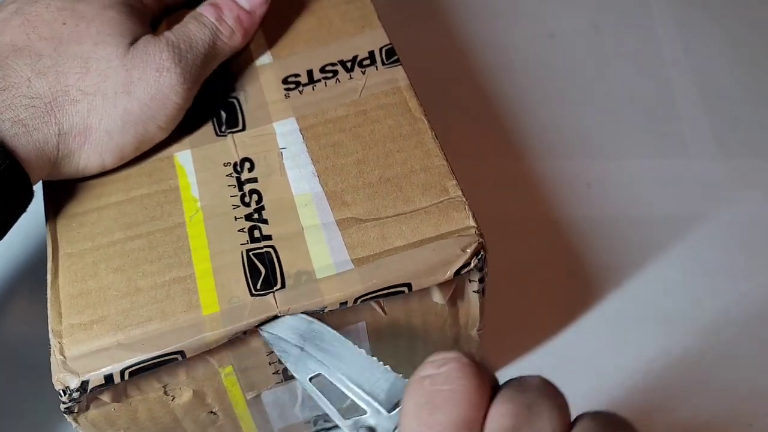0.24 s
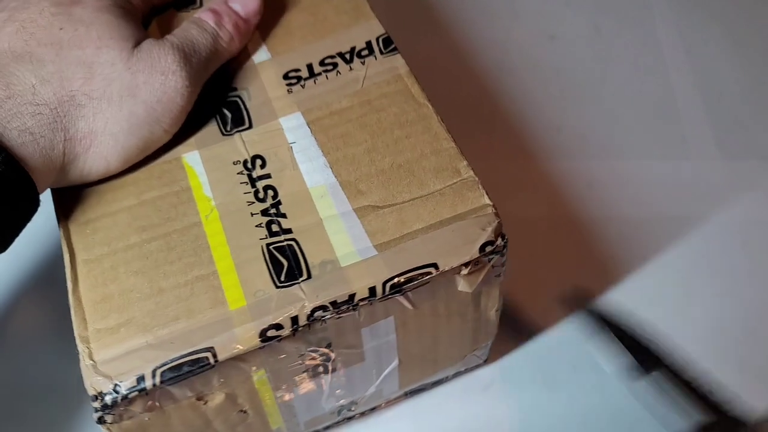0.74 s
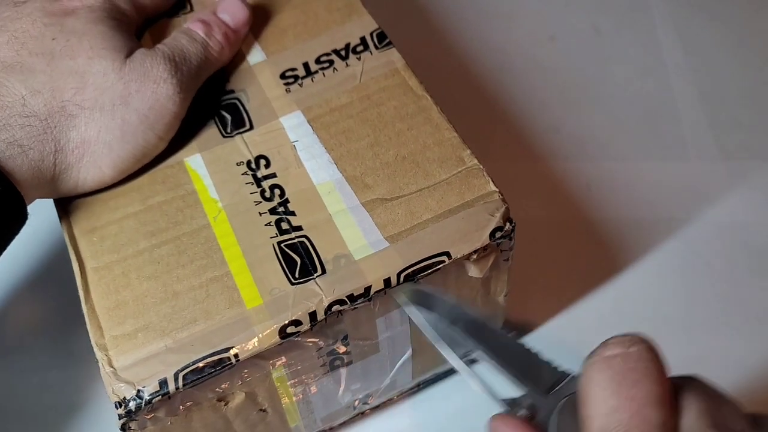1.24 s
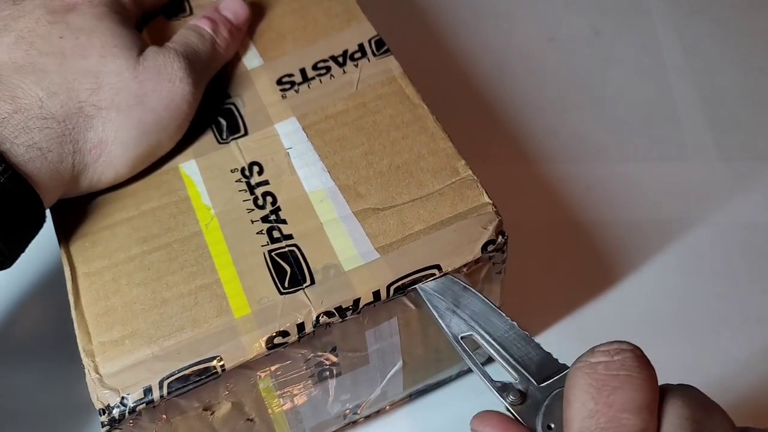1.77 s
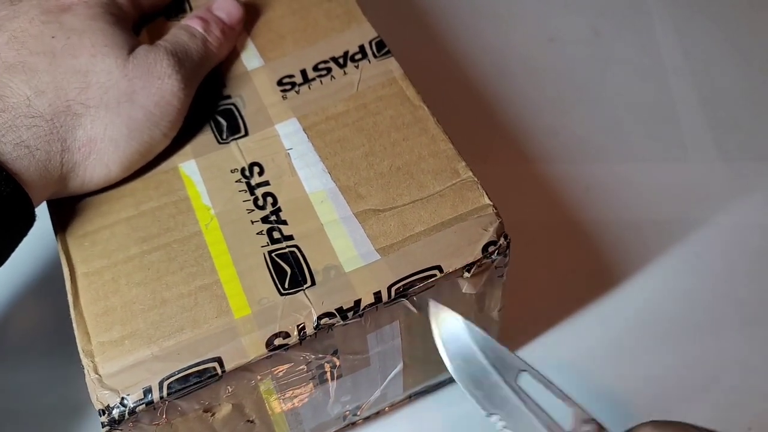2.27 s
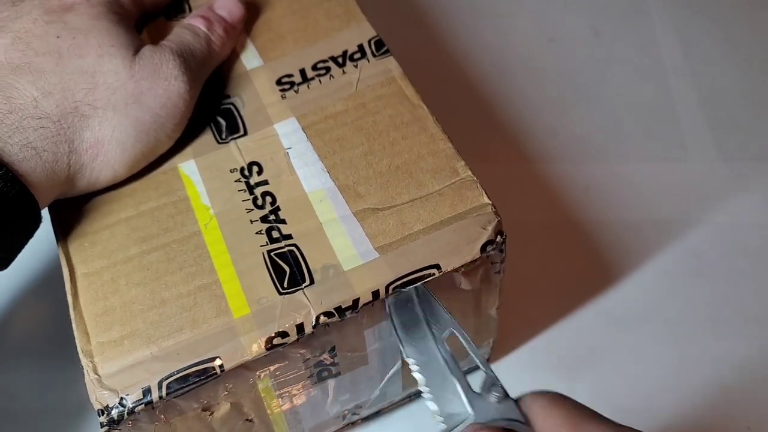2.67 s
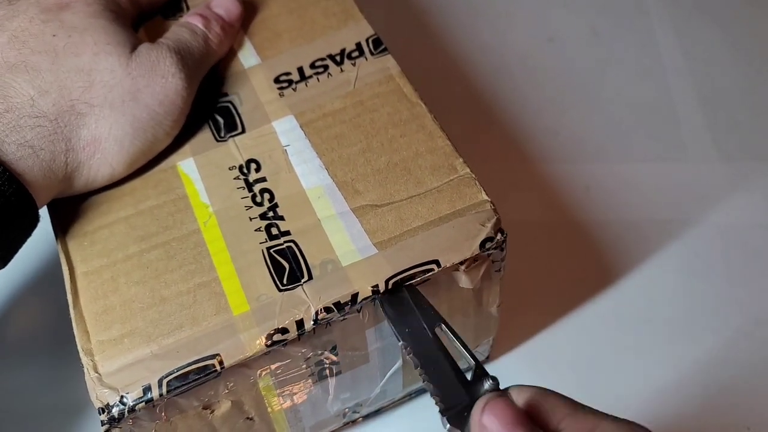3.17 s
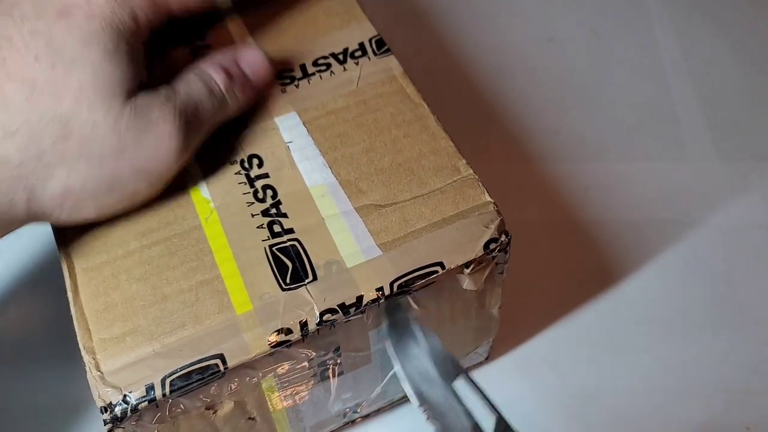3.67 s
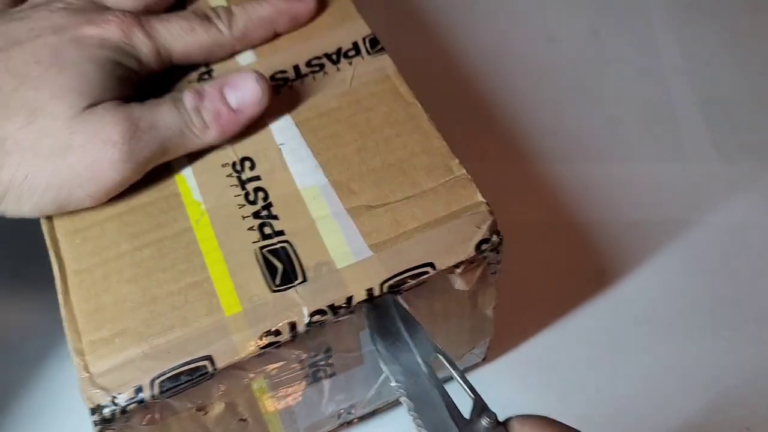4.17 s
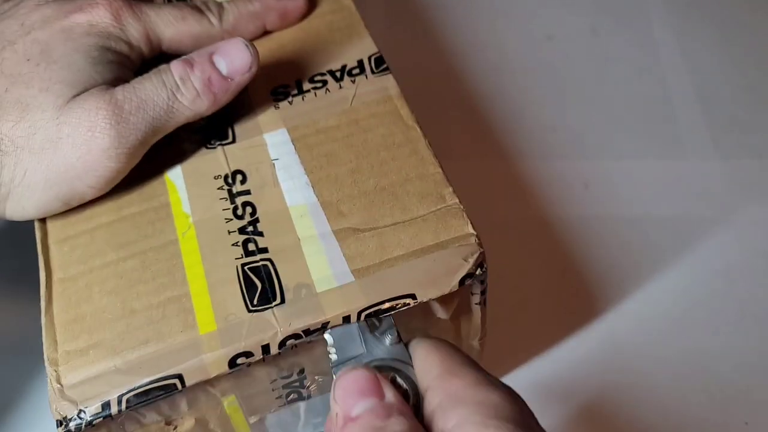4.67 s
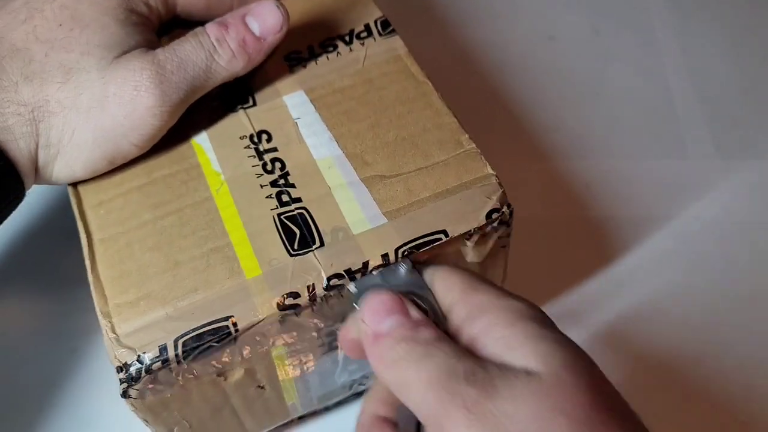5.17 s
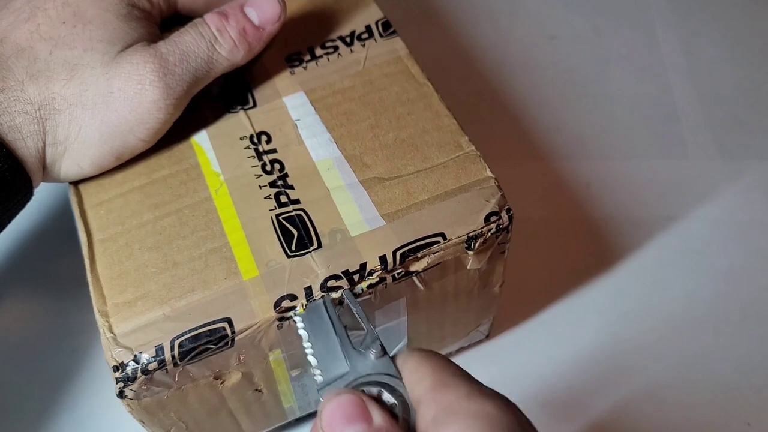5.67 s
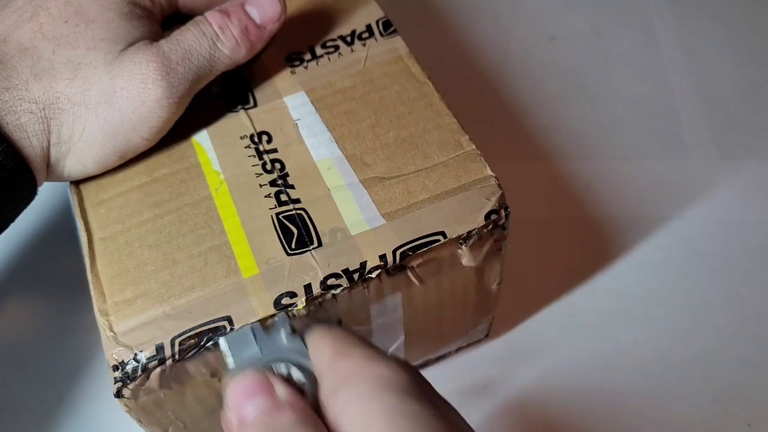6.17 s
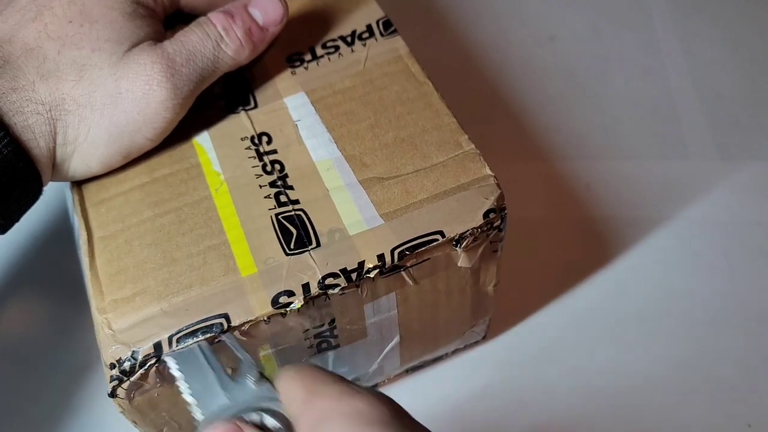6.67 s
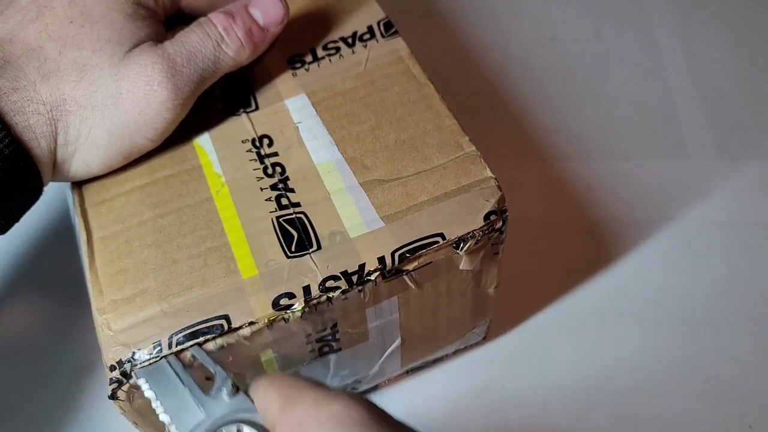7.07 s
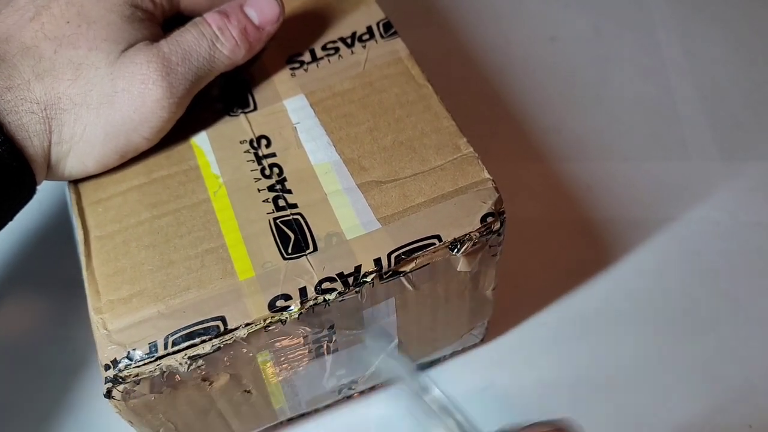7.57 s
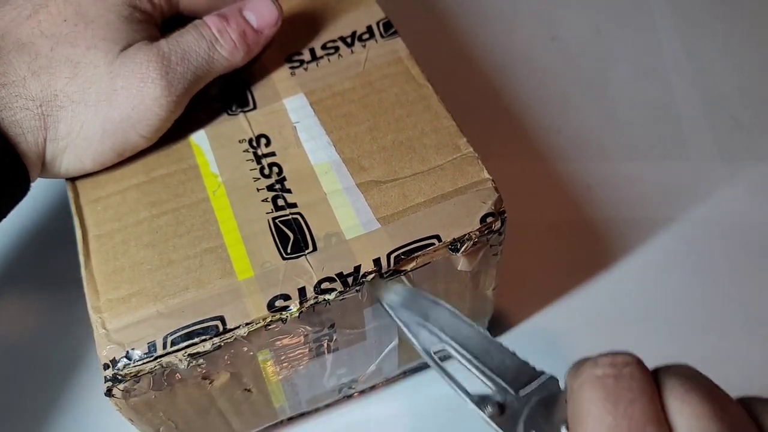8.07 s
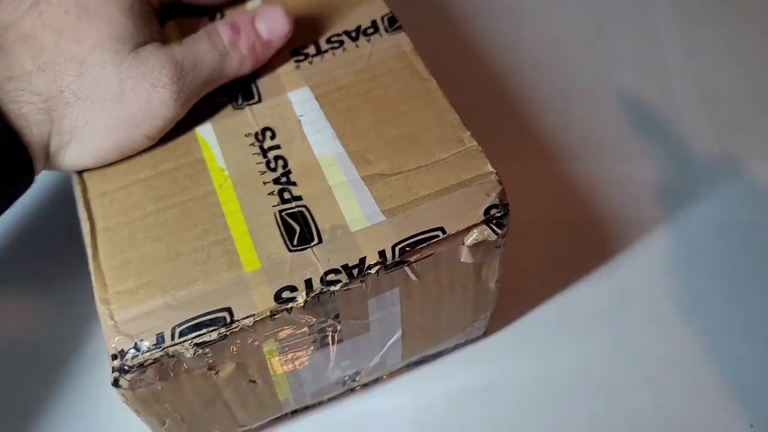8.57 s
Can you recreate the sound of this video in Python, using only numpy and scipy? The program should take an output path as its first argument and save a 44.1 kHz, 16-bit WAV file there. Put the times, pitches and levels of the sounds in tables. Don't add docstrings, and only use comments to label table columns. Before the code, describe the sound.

Indoors and very close, a serrated knife cuts a taped cardboard box, with a faint house hum beneath and a short bare-room echo. From 0 to 0.5 s there is light scratching and tiny ticks; at about 0.52 s a sharp, loud crack with a hollow knock, by far the loudest event. It falls almost silent until short crunchy scrapes at 1.35 and 1.6 s, and a soft drag near 2.2. Bites and pops come around 2.5 to 3.3 s, a bright tape snap at 3.3, then a lull. From 4.2 to 6.9 s irregular gritty sawing strokes crowd together, dry and raspy, with fibre snaps, a strong one at 5.05, and dull box thumps. Strokes weaken through 7.7 s, nearly stop, then a brief cluster of tearing and thuds at 8.4 to 8.7 fades into a faint scrape.

```python
import sys
import numpy as np
from scipy import signal
from scipy.fft import rfft, irfft, next_fast_len
from scipy.io import wavfile
from scipy.ndimage import uniform_filter1d, map_coordinates

SR = 44100
rng = np.random.default_rng(int(sys.argv[2]) if len(sys.argv) > 2 else 0)


def to_wav(sig):
    pcm = np.clip(np.atleast_2d(sig), -1, 1) * 32767
    pcm = np.round(pcm).astype(np.int16)
    wavfile.write(sys.argv[1], SR, pcm.T)


def boost_factor(decibels):
    exponent = np.asarray(decibels, float) / 20
    return 10 ** exponent


N = 389841

# f/Hz, width/Hz, level/dB
BOARD_MODES = [(608, 990, -13.5), (880, 87, -26), (1150, 590, 3), (1610, 820, 3.5), (2077, 150, 4.5),
               (3380, 510, 2), (3700, 390, -8.5), (5170, 770, -20)]
# f/Hz, width/Hz, level/dB
BOX_MODES = [(90.33, 23, 2.5), (150, 38, 3), (229.7, 21, 0.5), (301.4, 170, -3.5), (353, 50, -5),
             (387, 33, 8.5)]


def unit(x):
    return x / np.sqrt(np.mean(x ** 2))


def ring(x, hz, width_hz):
    return signal.lfilter(*signal.iirpeak(hz, hz / width_hz, SR), x)


def body(x, modes):
    return sum((-1) ** k * boost_factor(db) * ring(x, hz, width) for k, (hz, width, db) in enumerate(modes))


def cut(x, hz, kind, order=2):
    return signal.sosfilt(signal.butter(order, hz, kind, fs=SR, output="sos"), x)


def band_edge(x):
    return signal.sosfilt(signal.ellip(8, .3, 40, 14600, fs=SR, output="sos"), x)


def colour(x, points):
    hz, db = np.transpose(points)
    size = next_fast_len(N)
    f = np.maximum(np.arange(size // 2 + 1) * SR / size, 1)
    gain = boost_factor(np.interp(np.log(f), np.log(hz), db))
    return irfft(rfft(x, size) * gain, size)[..., :N]


def walk(rate):
    hold = int(SR / rate)
    levels = rng.standard_normal(N)[:N // hold + 1]
    return uniform_filter1d(np.repeat(levels, hold), hold)[:N]


def grains(rate, spread_db, smooth):
    chance, size = rng.random(N), rng.exponential(size=N)
    sign = np.sign(rng.standard_normal(N))
    slips = (chance < rate / SR) * sign * boost_factor(spread_db * np.minimum(size, 3.5))
    return unit(slips) + smooth * rng.standard_normal(N)


def likeness(mid, side, hz, split_hz):
    share = min(hz / split_hz, 1) ** 2
    return mid * np.sqrt(1 - share / 2) + np.sqrt(share / 2) * side * np.array([[1], [-1]])


def house():
    # f/Hz, level/dB (per Hz)
    hum_spectrum = [(15, -29), (25, 2.5), (69, 7.5), (264, -8), (363, -5), (673, -23), (1090, -19),
                    (1580, -14.5), (2370, -35.5), (6900, -32.5), (9770, -50), (12400, -48), (15000, -43)]
    mid, left, right = colour(rng.standard_normal((3, N)), hum_spectrum) * boost_factor(0.5 * walk(9))
    bass = cut(mid, 720, "lowpass")
    apart = np.array([left, right])
    return boost_factor(-63.5) * unit(bass + cut(apart, 600, "highpass") + .35 * apart)


def room(x):
    # f/Hz, t60/s, level/dB
    decay_bands = [(91.1, 0.45, -27), (180, .45, -24.5), (335, 0.2, -24), (780, 0.38, -21),
                   (1440, .5, -18.5), (2820, 0.74, -20.5), (5570, 0.3, -12.5), (11000, 0.36, -18.5)]
    t, tail = np.arange(SR) / SR, 0
    for hz, t60, db in decay_bands:
        octave = (hz / np.sqrt(2), hz * np.sqrt(2))
        mid, side = cut(rng.standard_normal((2, SR)), octave, "bandpass", order=1)
        fade = np.exp(-np.log(1000) * t / t60) * (1 - np.exp(-t / 0.0066))
        echoes = likeness(mid, side, hz, split_hz=900.) * fade
        tail = tail + boost_factor(db) * echoes / np.sqrt(SR * t60 / 14) * np.sqrt(SR / hz)
    return signal.fftconvolve(x[None], tail, axes=1)[:, :N]


def thumps():
    # t/s, peak level/dB, wall note f/Hz
    blows = [(0.497, -27, 443), (0.518, -12.5, 415), (0.542, -26, 416), (1.347, -27.5, 338),
             (1.406, -27.5, 145), (1.588, -33, 288), (1.618, -27, 362), (2.48, -45.5, 208),
             (2.712, -34, 177), (2.858, -34, 336), (3.303, -39.5, 68), (4.252, -38, 93), (4.414, -39, 333),
             (4.585, -27, 107), (4.688, -30, 335), (4.802, -31.5, 350), (5.038, -41, 390),
             (5.481, -21, 125), (5.656, -26, 175), (5.833, -26, 265), (5.988, -27, 152),
             (6.139, -27.5, 252), (6.274, -21, 168), (6.612, -31.5, 162), (6.911, -33.5, 400),
             (7.588, -37, 229), (7.873, -43, 143), (8.442, -21.5, 175), (8.505, -28, 150),
             (8.663, -35.5, 356)]
    # t/s, peak level/dB, wall note f/Hz
    further_blows = [(2.497, -41.5, 231), (3.062, -40, 402), (3.551, -41, 306), (4.33, -36.5, 310),
                     (4.361, -40.5, 330), (5.334, -34, 313.6), (5.698, -28, 156), (6.024, -27, 148),
                     (6.038, -35, 180), (6.292, -30, 141), (6.646, -29.5, 176), (6.817, -34.5, 383),
                     (6.939, -34, 390), (7.209, -49, 374), (8.281, -42.5, 127)]
    size = 8192
    out, t = np.zeros(N + size), np.arange(size) / SR
    for s, db, hz in blows + further_blows:
        push = np.sin(2 * np.pi * hz * t) * (t < .5 / hz)
        thump = ring(push, hz, .45 * hz) + .25 * body(push, BOX_MODES)
        i = int(s * SR)
        out[i:i + size] += boost_factor(db) * thump / np.abs(thump).max()
    return cut(out[:N], 55, "highpass")


def snaps():
    # t/s, body peak level/dB, body f/Hz, edge peak level/dB
    tape_snaps = [(.1771, -47, 1700, -43), (.3863, -49, 1640, -36), (.5491, -14, 1560, -39),
                  (1.9501, -74, 600, -54), (7.7185, -71, 650, -72), (8.05, -70, 1500, -66),
                  (3.3083, -25, 1120, -16), (3.5535, -39, 1650, -52), (3.7848, -59, 1150, -64),
                  (4.6862, -30, 1610, -46), (6.0844, -45, 1610, -41), (6.5553, -47, 1180, -30),
                  (6.7297, -48, 1250, -43), (8.3977, -38, 600, -44)]
    seam_snaps = [(.2725, -38, 1440, -57), (.4658, -39, 1130, -35), (.488, -38, 600, -40),
                  (.5134, -19, 850, -46), (4.196, -50, 900, -58), (1.6207, -33, 1780, -43),
                  (2.7093, -34, 940, -34), (2.8689, -14, 1050, -20), (3.2047, -40, 940, -58),
                  (3.2394, -39, 900, -46), (3.5856, -33, 800, -50), (4.2414, -34, 1730, -46),
                  (4.4986, -40, 980, -40), (4.5252, -29, 830, -37), (4.9514, -35, 1220, -26),
                  (5.0943, -31, 640, -25), (5.2483, -36, 1660, -37), (5.4372, -31, 2130, -26),
                  (5.4845, -21, 880, -38), (6.143, -26, 1750, -31), (6.1572, -20, 2010, -25),
                  (6.1706, -30, 2070, -26), (6.2746, -33, 600, -33), (6.9083, -32, 600, -37),
                  (7.2032, -40, 1280, -43), (7.9651, -60, 1700, -50), (8.4157, -28, 600, -35),
                  (8.4427, -27, 600, -32), (8.453, -29, 1100, -31), (8.5095, -17, 1550, -36)]
    fibre_snaps = [(.096, -40, 1320, -41), (.2529, -37, 1380, -43), (.4104, -43, 1710, -35),
                   (.4961, -34, 600, -29), (.5181, -5, 980, -10), (.5577, -11, 2130, -23),
                   (1.0915, -58, 1500, -66), (1.3501, -21, 800, -13), (1.5662, -31, 2130, -39),
                   (1.5957, -35, 1020, -38), (2.4728, -44, 720, -55), (3.0765, -35, 600, -36),
                   (3.6829, -42, 730, -56), (4.4293, -28, 790, -34), (4.4337, -28, 1290, -31),
                   (4.695, -16, 600, -13), (4.7303, -17, 950, -20), (5.051, -7, 780, -7),
                   (5.081, -22, 820, -18), (5.3335, -35, 600, -40), (5.4727, -22, 740, -25),
                   (5.498, -16, 860, -24), (5.612, -33, 2120, -33), (5.6427, -30, 600, -30),
                   (5.7901, -40, 1640, -25), (5.8428, -14, 1170, -11), (5.8706, -18, 1800, -14),
                   (7.5903, -41, 800, -47), (7.8784, -53, 600, -54), (8.6742, -30, 800, -40)]
    # air over edge level/dB, rustle over edge level/dB, left minus right level/dB
    tape_kind = (11, -12.5, 1.7)
    seam_kind = (-3.4, -29, -.6)
    fibre_kind = (-12, -37.5, -.4)
    kinds = ((tape_snaps, tape_kind), (seam_snaps, seam_kind), (fibre_snaps, fibre_kind))
    rows = [(*row, *kind) for table, kind in kinds for row in table]

    size = 8192
    out, t = np.zeros((2, N + size)), np.arange(size) / SR
    for s, body_db, hz, edge_db, air_db, rustle_db, pan_db in rows:
        noise = rng.standard_normal(size)
        burst = .15 * noise * np.exp(-t / .0016) * (1 - np.exp(-t / .001))
        burst[30] += 1
        burst[75 + int(12 * noise[0])] -= .3
        spot = cut(ring(burst, hz, .7 * hz) + .15 * body(burst, BOARD_MODES), 2800, "lowpass")
        edge = cut(burst, (2500, 6500), "bandpass", order=3)
        air = cut(burst, (6500, 15000), "bandpass", order=3)
        skin = ring(noise * np.exp(-t / 0.05) * (t > .001), 6500, 570)
        skin_db = edge_db + rustle_db + .7 * (edge_db + 16)
        parts = ((body_db, spot), (edge_db, edge), (edge_db + air_db, air), (skin_db, skin))
        snap = sum(boost_factor(db) * x / np.abs(x).max() for db, x in parts)
        i = int(s * SR) - 44
        out[:, i:i + size] += boost_factor(2.5 + np.array([[pan_db], [-pan_db]]) / 2) * snap
    return out[:, :N]


def pressure():
    # t/s, length/s, force level/dB, tape against board level/dB, weight on the box level/dB
    bites = [(0, 0.51, -56, -6.5, -6.5), (.387, 0.061, -67.5, 19.5, -2), (.521, 0.073, -23, -10, 5),
             (.62, 0.45, -63.5, -28, 11.5), (1.354, 0.091, -45.5, -7, 12.5), (1.567, 0.11, -48, -6, 5),
             (2.48, 0.19, -65, -24, 6.5), (2.715, 0.077, -40.5, -8, 8.5), (2.868, 0.035, -34, -1.5, -0.5),
             (2.89, 0.44, -63.5, 4.5, 12.5), (3.308, 0.02, -47, 19, -1.5), (3.33, 0.16, -83, 14, 6),
             (4.24, 0.14, -54.5, -1, 7), (5.024, 0.17, -52, -4.5, 15.5), (4.695, 0.032, -33.5, -22, 8.5),
             (4.952, .09, -48.5, 3, -2), (5.048, 0.045, -40.5, -15.5, 16), (5.438, 0.048, -44.5, 0.5, -6),
             (6.912, 0.17, -47, -0.5, 8.5), (7.209, 0.069, -54.5, 1.5, 12), (8.287, 0.042, -62, -26.5, 17),
             (8.447, 0.047, -35, -4, 12), (8.511, 0.069, -45, -1.5, 9.5)]
    drags = [(.511, 0.14, -49.5, 1.5, 9), (1.15, 0.1, -72.5, -12, 11.5), (1.659, 0.11, -47.5, -2, 11),
             (2.034, 0.21, -56, -22, 5), (2.7, 0.12, -61, -5, 1), (4.43, 0.34, -49.5, -6.5, 3.5),
             (4.68, 0.2, -50.5, -1, 4.5), (3.3, 0.049, -60, 8.5, -5.5), (5.357, 0.34, -57, 3.5, 13.5),
             (6.03, 0.24, -58.5, 6.5, 17), (7.125, 0.29, -58, -1.5, 7.5), (7.587, 0.22, -59.5, -1, 1.5),
             (8.416, .14, -46, -3.5, 5), (8.84, 0.57, -65.5, -2.5, 6)]
    strokes = [(.271, 0.17, -53, -4, -8.5), (3.087, 0.083, -48.5, -3, 4), (3.219, 0.089, -54, -4, 3.5),
               (3.56, 0.57, -67, 3.5, 9.5), (3.89, 0.29, -83, -12, 18), (4.1, .15, -71, -2.5, 1),
               (4.512, 0.14, -52.5, 2.5, 11.5), (4.805, 0.21, -47.5, -1.5, 11), (5.098, 0.17, -57, 8, 17),
               (5.238, 0.22, -54, -0.5, -13), (5.488, 0.15, -41.5, -2, 11.5), (5.626, 0.23, -46, -2, 4),
               (5.697, 0.12, -52, 2.5, 19), (5.85, 0.17, -41.5, -4.5, 5), (5.921, 0.52, -50, -2.5, -16),
               (6.16, .16, -39.5, -5, 2), (6.298, 0.26, -49, 3, 12), (6.461, 0.18, -48.5, -1.5, 6),
               (6.607, 0.21, -48, 1, 5), (6.812, 0.31, -54.5, -1.5, 10.5), (7.337, 0.15, -74, -0.5, 19.5),
               (7.486, 0.14, -59, -3, 7), (7.95, 0.91, -82, 5, 10), (8.67, 0.14, -58, -8.5, 13.5)]
    rest_levels = [-91.5, -101, -80]
    swing_db = 30
    edge = 1.465
    t, power = np.arange(N) / SR, boost_factor(rest_levels)[:, None] ** 2
    for moves, rise, hold in ((bites, 0.19, 0), (drags, 0.85, 0), (strokes, 0.51, 0.091)):
        for s, length, db, tape_db, box_db in moves:
            away = np.maximum((s - t) / rise, (t - s) / (1 - rise)) / length
            away = np.maximum(away - hold, 0) / (1 - hold)
            peak = boost_factor([[db], [db + tape_db], [db + box_db]]) ** 2
            power = power + peak * np.exp(-np.log(10) / 10 * swing_db * away ** edge)
    return 10 * np.log10(power)


def saw():
    # f/Hz, level/dB (per Hz)
    tape_spectrum = [(1470, -16), (2500, -9), (3890, -4.5), (4550, -2), (7080, -3), (9960, -9), (13000, -1),
                     (14700, -10.5), (16000, -39)]
    board_db, tape_db, box_db = pressure()
    catch = boost_factor(3.0 * walk(60) + 3.0 * walk(180))
    slips = grains(1000., spread_db=4.0, smooth=.5) * catch

    flute_db = 4.2
    board = 0.05 * cut(slips, (500, 3000), "bandpass", order=1)
    for hz, width, db in BOARD_MODES:
        drive = .5 * slips + catch * grains(350., spread_db=4.5, smooth=0.19)
        board = board + boost_factor(db + flute_db * walk(50)) * ring(drive, hz, width)

    sizzle = np.array([grains(4000., spread_db=9.0, smooth=0.93) for _ in range(2)])
    strip = colour(slips + 6.9 * catch * sizzle, tape_spectrum)
    tape = .35 * strip
    for hz in (2600, 3900, 5900, 8800, 12500):
        tape = tape + boost_factor(4.0 * walk(25)) * ring(strip, hz, hz / 2)
    tape = tape / np.std(cut(tape, 4500, "highpass", order=4))

    shoves = grains(150., spread_db=2.5, smooth=.4) * boost_factor(2.5 * walk(30))
    box = 0.31 * cut(shoves, (100, 900), "bandpass", order=1)
    for hz, width, db in BOX_MODES:
        box = box + boost_factor(db + flute_db * walk(7.5)) * ring(shoves, hz, width)

    return boost_factor(board_db + 4.5) * unit(board) + boost_factor(tape_db + 3.5) * tape + boost_factor(box_db - 1.5) * unit(box)


def scene():
    # t/s, lag/samples
    left_lag = [(0, 3.5), (.45, 3), (3.299, 4.5), (3.602, -3.5), (4.098, 5), (5.398, 2), (5.801, 1.5),
                (6.298, 0.5), (7.803, -3), (8.1, 5.5), (8.84, 5)]
    # t/ms, level/dB
    table_echo = [
        (.45, -18.5),
        (.8, -8),
    ]
    blows = thumps()
    rasp, breaks = saw() + blows, snaps()
    knife = band_edge(rasp) + breaks

    n = np.arange(N)
    half_lag = np.interp(n / SR, *np.transpose(left_lag)) / 2
    near = np.array([map_coordinates(knife[0], [n - half_lag], order=3),
                     map_coordinates(knife[1], [n + half_lag], order=3)])
    table = np.array([boost_factor(db) * np.roll(cut(x, 2800, "highpass"), int(ms * SR / 1000))
                      for x, (ms, db) in zip(near, table_echo)])
    shake = cut(blows, (35, 90), "bandpass") * np.array([[-.3], [.6]])
    far = room((rasp + boost_factor(-3.5) * breaks).mean(axis=0)) + house()
    return near + table + shake + band_edge(far)


def low_pass(x):
    return signal.sosfilt(signal.butter(12, 16510, fs=SR, output="sos"), x)


def record(dry):
    left = cut(dry[0], 54, "highpass", order=1)
    right = cut(dry[1], 12, "highpass", order=1)
    rounded = np.tanh(.8 * np.array([left, right])) / .8
    return low_pass(cut(rounded, 16000, "lowpass", order=16))


dry = scene()
out = record(dry)
to_wav(out)
```